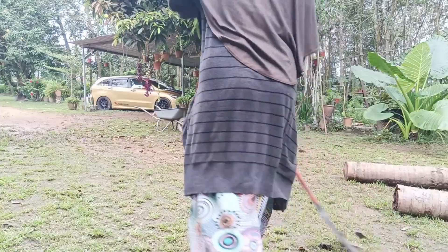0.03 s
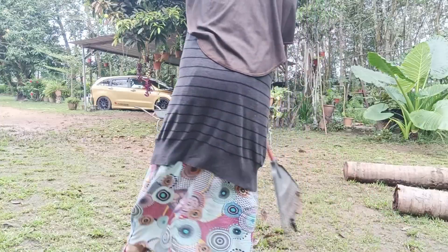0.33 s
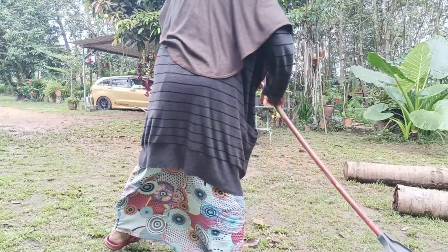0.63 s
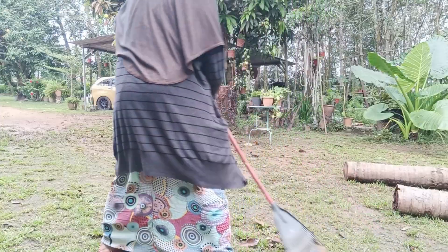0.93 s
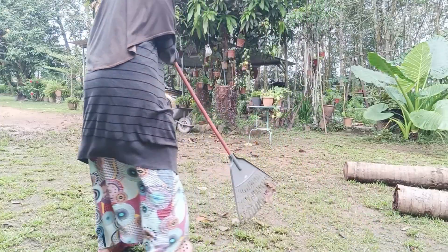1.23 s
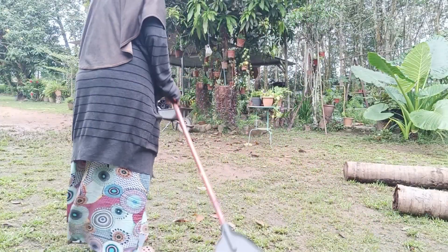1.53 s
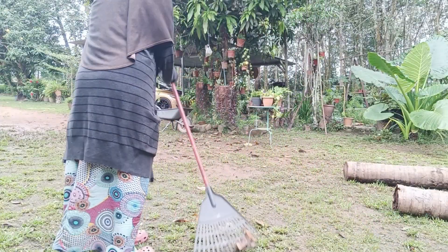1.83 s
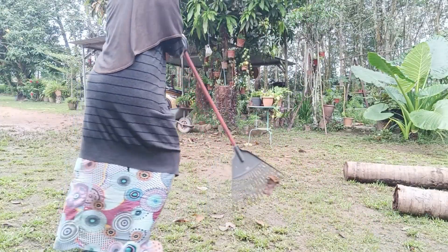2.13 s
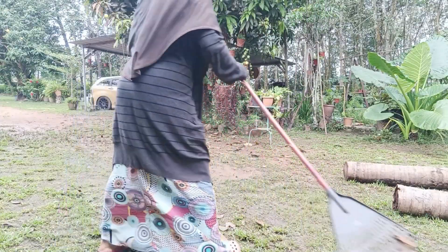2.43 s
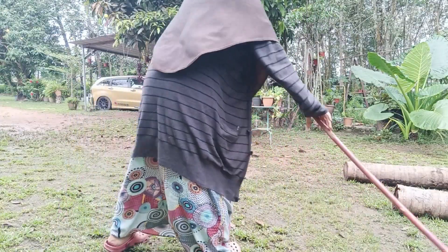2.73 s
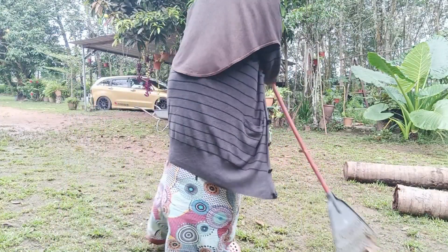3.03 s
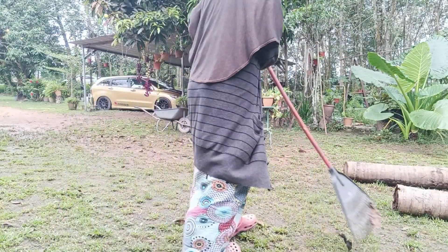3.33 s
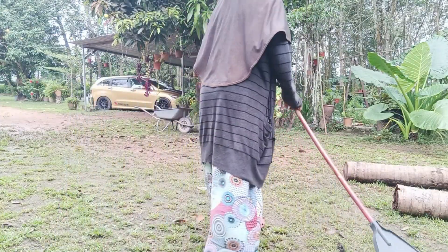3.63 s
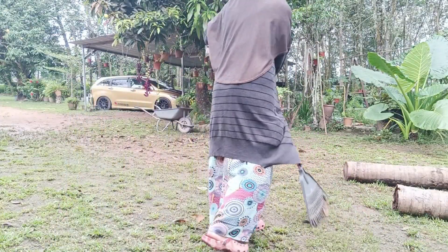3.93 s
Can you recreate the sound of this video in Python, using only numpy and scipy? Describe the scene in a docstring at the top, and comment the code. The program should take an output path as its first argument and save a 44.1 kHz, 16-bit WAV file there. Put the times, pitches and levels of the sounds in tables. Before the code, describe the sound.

A rake scrapes over grass and dry leaves five times, its tines clicking.

```python
"""Raking a yard

A fan rake is pulled five times over grass and dry ground, a metre or two away. Its tines scrape
the soil, ring the fan, crackle through dry leaves and now and then snap free. Behind it are a low
drone and a hiss, whining insects, a few soft notes and a vehicle slowly drawing nearer."""
import sys
import numpy as np
from scipy import signal
from scipy.fft import rfft, irfft
from scipy.io import wavfile
from scipy.ndimage import map_coordinates

SR = 44100
rng = np.random.default_rng(int(sys.argv[2]) if len(sys.argv) > 2 else 0)


def dump_mix(stems):
    """Bounce the given channels to the path in sys.argv[1] as a 16-bit WAV at rate SR."""
    frames = np.atleast_2d(stems).T  # one column per channel
    limited = np.clip(frames, -1, 1)  # hard clip at full scale
    pcm = np.round(limited * 32767).astype(np.int16)
    wavfile.write(sys.argv[1], SR, pcm)


N = 176400  # 4 seconds


def undb(db):
    """Turn decibels into a gain."""
    return 10 ** (np.asarray(db) / 20)


def unit(x):
    """Scale a signal to an average (rms) level of 1."""
    return x / np.sqrt(np.mean(x ** 2) + 1e-20)


def noise():
    """White noise as long as the scene."""
    return rng.standard_normal(N)


def curves(rows):
    """Join a table's rows with straight lines: one curve for each column after the time."""
    times, *columns = np.array(rows, float).T
    return np.array([np.interp(np.arange(N) / SR, times, column) for column in columns])


def wander(per_s):
    """A random curve of size about 1 that turns per_s times a second."""
    return unit(np.interp(np.arange(N) / SR * per_s, np.arange(4096), rng.standard_normal(4096)))


def colour(x, points):
    """Shape a sound's lows and highs through (Hz, dB) points; white noise keeps its power."""
    size = 8192
    hz, db = np.array(points, float).T
    freqs = np.maximum(np.fft.rfftfreq(size, 1 / SR), 1)
    gains = undb(np.interp(np.log(freqs), np.log(hz), db))
    # fold the cepstrum so that the filter never rings before a hit
    cepstrum = irfft(np.log(gains))
    cepstrum[1:size // 2] *= 2
    cepstrum[size // 2 + 1:] = 0
    response = irfft(np.exp(rfft(cepstrum)))
    return signal.fftconvolve(x, response / np.linalg.norm(response))[:N]


def band(hz, width_hz):
    """A band of noise around a pitch that may move."""
    lowpass = signal.butter(4, width_hz / 2, fs=SR, output="sos")
    slow = signal.sosfilt(lowpass, noise() + 1j * noise())
    carrier = np.exp(2j * np.pi * np.cumsum(hz * np.ones(N)) / SR)
    return unit((slow * carrier).real)


def burst(start, rise_s, decay_s):
    """A level that rises in a straight line, then dies away."""
    age = np.arange(N) / SR - start
    return np.clip(age / rise_s, 0, 1) * np.exp(-np.clip((age - rise_s) / decay_s, 0, 50))


def die_away(hits, decay_s):
    """Give every hit a fading tail."""
    return signal.lfilter([1], [1, -np.exp(-1 / (decay_s * SR))], hits)


def flicker(x, depth_db, width_hz=260, per_s=22):
    """Make neighbouring bands of a hiss waver, each on its own."""
    freqs, times, spectrum = signal.stft(x, SR, nperseg=1024)
    chance = rng.standard_normal((256, 256))
    grid = np.meshgrid(freqs / width_hz, times * per_s, indexing="ij")
    db = depth_db * map_coordinates(chance, grid, order=1, mode="mirror")
    return signal.istft(spectrum * undb(db), SR)[1][:N]


# The tone of the drone, middle hiss and high hiss. Each row: frequency in Hz, strength in dB.
DRONE_COLOUR = [(25, -40), (45, -32), (80, -23), (100, -13.5), (125, 2), (165, 2), (195, -2), (280, -36),
                (400, -30), (700, -77)]
MID_HISS_COLOUR = [(300, -32), (660, -41), (780, -17), (880, 2.5), (1250, 3.5), (1750, 1.5), (2000, -12.5),
                   (2400, -21), (2700, -40), (4000, -58)]
HIGH_HISS_COLOUR = [(3000, -43), (4150, -23), (4500, -0.5), (4950, -4), (5450, -12), (5750, -18),
                    (6500, -12), (7400, -23), (8300, -29), (8900, -21.5), (10600, -19.5), (11400, -30),
                    (15500, -41)]
# How loud the drone is. Each row: time in seconds, level in dB.
DRONE_LEVEL = [(0, -47), (.66, -51), (.71, -59.5), (.79, -49.5), (.9, -45), (1.3, -47), (1.7, -42.5),
               (2.3, -40.5), (3.0, -38), (3.3, -44), (4, -45)]
# How loud the hiss is. Each row: time in seconds, middle hiss in dB, high hiss in dB.
HISS_LEVEL = [(0, -46.5, -63), (.45, -52, -61), (.682, -52, -63), (.692, -58.5, -68.5), (.87, -62, -72),
              (1.25, -49, -60.5), (1.455, -46, -59), (1.48, -56, -68.5), (1.7, -53.5, -66),
              (2.1, -63, -60.5), (2.8, -45, -64), (4, -51, -59.5)]


def drone_and_hiss():
    """A road's low drone, and a background hiss that twice drops abruptly, then returns."""
    mid_gain, high_gain = undb(curves(HISS_LEVEL) + 0.5 * wander(24.95))
    # the high hiss is given a patchy, processed-sounding flicker
    high_hiss = flicker(colour(noise(), HIGH_HISS_COLOUR), depth_db=4.0)
    drone = undb(curves(DRONE_LEVEL)[0]) * colour(noise(), DRONE_COLOUR)
    return drone + mid_gain * colour(noise(), MID_HISS_COLOUR) + high_gain * high_hiss


# The insects' whines. Each row: pitch in Hz, width in Hz, relative level in dB.
WHINES = [(4770, 270, -2), (6680, 390, 0.5), (9000, 430, -6), (10600, 600, -12.5)]
# How the whole chorus swells and fades. Each row: time in seconds, gain in dB.
CHORUS_LEVEL = [(0, -67), (.66, -71), (.8, -85), (1.4, -69), (1.5, -84), (1.7, -81), (2.1, -75), (4, -78.5)]


def insects(drift=0.0078, throb_db=3.5):
    """Distant insects: thin whines that drift in pitch and throb, each on its own."""
    chorus = sum(undb(db + throb_db * wander(14)) * band(hz * (1 + drift * wander(4.3)), width)
                 for hz, width, db in WHINES)
    return undb(curves(CHORUS_LEVEL)[0]) * chorus


# The tone of the tyres. Each row: frequency in Hz, strength in dB.
TYRE_COLOUR = [(40, -73), (150, -16.5), (290, 3.5), (350, -14), (430, -47), (620, -27), (790, -1),
               (1000, 1.5), (1400, -1), (2000, -3.5), (2600, -11.5), (3500, -20), (4700, -22), (5800, -30),
               (7700, -38.5), (9200, -35), (12000, -43), (15500, -46)]
# The vehicle drawing nearer. Each row: time in seconds, tyres in dB, roar in dB,
# exhaust pitch in Hz, exhaust in dB, rumble in dB.
APPROACH = [(0, -75, -91, 280, -62, -78), (.65, -71, -90, 280, -75, -61), (.9, -56.5, -59, 280, -47, -85),
            (1.3, -47, -95, 285, -52.5, -74), (1.44, -52.5, -85, 278.2, -60, -64),
            (1.68, -55.5, -81, 275, -50.5, -67), (2.1, -45, -60.5, 270, -48.5, -64),
            (2.45, -42.5, -57.5, 280, -49.5, -78), (2.77, -43.5, -54, 315, -44, -62),
            (2.87, -43.5, -47.5, 265, -50.5, -48), (3.25, -41, -59, 195, -36.5, -54),
            (3.4, -40, -49.5, 225, -41, -42.5), (3.7, -37, -44.5, 240, -36.5, -42.5),
            (3.87, -41.5, -43, 272, -35.5, -41), (4, -42, -38, 300, -49, -43)]


def vehicle():
    """Tyre hiss grows and fills out into a roar, while the exhaust booms over a low rumble."""
    tyres_db, roar_db, exhaust_hz, exhaust_db, rumble_db = curves(APPROACH)
    tyres = undb(tyres_db) * flicker(colour(noise(), TYRE_COLOUR), depth_db=2.0)
    roar = undb(roar_db) * band(hz=490, width_hz=350)
    exhaust = undb(exhaust_db) * band(exhaust_hz, width_hz=90)
    rumble = undb(rumble_db) * band(hz=86.8, width_hz=44)
    return tyres + roar + exhaust + rumble


# Hoot-like notes. Each row: start in seconds, length in seconds, pitch in Hz, level in dB.
HOOTS = [(.345, 0.12, 332, -52.5), (0.353, 0.087, 510, -59), (0.757, 0.049, 588, -49.5),
         (0.886, 0.036, 603, -44), (1.338, 0.058, 274, -40), (1.406, 0.13, 279, -42),
         (1.448, 0.082, 508, -62)]


def hoots(waver=0.0144, hoarseness=0.32):
    """Soft, far-off notes swell and fade: each is a wavering tone with a little noise."""
    t = np.arange(N) / SR
    out = np.zeros(N)
    for start, length, hz, db in HOOTS:
        swell = np.sin(np.pi * np.clip((t - start) / length, 0, 1))
        pitch = hz * (1 + waver * wander(39.4))
        tone = np.sin(2 * np.pi * np.cumsum(pitch) / SR)
        rasp = hoarseness * band(hz, width_hz=130)
        out += undb(db) * swell * (tone + rasp) / np.hypot(1, hoarseness)
    return out


# Bumps on the turf. Each row: start in seconds, pitch in Hz, level in dB.
BUMPS = [(0.947, 687, -40.5), (1.76, 870, -41.5), (1.783, 852, -42), (3.926, 802, -32.5), (3.966, 800, -33)]


def turf_bumps():
    """The rake and feet meet the turf with short, dull bumps."""
    return sum(undb(db) * burst(start, rise_s=0.0052, decay_s=0.015) * band(hz, width_hz=280)
               for start, hz, db in BUMPS)


# Breaking stalks. Each row: start in seconds, level in dB.
STALK_BREAKS = [(0.205, -22), (0.2453, -25), (1.04, -34), (1.163, -19.5), (1.197, -32), (1.9245, -16),
                (1.9835, -11), (2.4355, -32), (3.0775, -20.5), (3.1485, -25), (3.887, -20)]
# The tone of a break. Each row: frequency in Hz, strength in dB.
BREAK_COLOUR = [(1000, -10), (3000, -4), (5000, 0.5), (8000, -4.5), (11500, -5), (14000, 1.5)]


def stalk_breaks():
    """Each dry stalk breaks with one very short, bright click."""
    level = sum(undb(db) * burst(start, rise_s=0.0001, decay_s=0.00027) for start, db in STALK_BREAKS)
    return colour(noise() * level, BREAK_COLOUR)


# Faint leaf ticks, quiet at first, growing louder from the third stroke to the end.
# Each row: time in seconds, relative level in dB.
TICK_LEVEL = [(0, -78), (1.7, -80), (2.1, -71), (4, -67)]


def settling_leaves(per_s=69, spread_db=0.5):
    """The level curve of the lone, faint ticks that leaves make as they settle."""
    hits = rng.random(N) < per_s / SR
    db = curves(TICK_LEVEL)[0] + spread_db * np.minimum(rng.exponential(size=N), 4)
    return die_away(hits * undb(db), decay_s=0.002)


# The tones of the rake's fan. Each row: pitch in Hz, relative level in dB, seconds to fade by 60 dB.
FAN_TONES = [(342, -15.5, 0.067), (507, -2.5, 0.041), (696, -1, 0.12), (779, 4, 0.07), (1020, 1, 0.089),
             (1356, 0.5, 0.075), (1427, -3.5, 0.091), (1615, 0.5, 0.047), (1850, 4, 0.075),
             (1923, -0.5, 0.15), (2100, -14, 0.074), (2376, -3.5, 0.085), (2590, -9.5, 0.3),
             (2840, -13, 0.21), (3740, -11.5, 0.13), (3880, -9, 0.17), (4390, -8, 0.22), (5260, -30, 0.12)]


def fan_ring(push, lowest_hz=265):
    """The fan of tines rings on after every push, but gives off little bass."""
    t = np.arange(SR // 2) / SR
    ring = sum(undb(db - 60 * t / fade_s) * np.sin(2 * np.pi * hz * t) / np.sqrt(fade_s)
               for hz, db, fade_s in FAN_TONES)
    ring = signal.sosfilt(signal.butter(4, lowest_hz, "high", fs=SR, output="sos"), ring)
    return signal.fftconvolve(push, ring / np.linalg.norm(ring))[:N]


# Slaps between tines. Each row: start in seconds, level in dB.
SLAPS = [(0.023, -35), (0.124, -34), (0.181, -27), (1.887, -19), (1.891, -19), (1.953, -14.5), (1.961, -30),
         (1.996, -17), (2.0052, -17), (2.0147, -24)]
# The tone of a slap. Each row: frequency in Hz, strength in dB.
SLAP_COLOUR = [(500, -37), (900, -12), (1300, 3.5), (2200, 2), (2700, -10.5), (3400, -35), (8000, -32)]


def tine_slaps(ring_db=-11.5):
    """Tines slap each other: a short, hollow crack that also rings the fan."""
    slaps = noise() * sum(undb(db) * burst(start, rise_s=0.00041, decay_s=0.0016) for start, db in SLAPS)
    return colour(slaps, SLAP_COLOUR) + undb(ring_db) * fan_ring(slaps)


# Tines snapping free. Each row: start in seconds, then relative levels in dB of knock, crack and tick.
SNAPS = [(0.051, -44, -36, -41), (0.1222, -25.5, -27.5, -31), (0.1555, -48, -27, -46),
         (0.191, -29, -30, -39), (0.2045, -44, -42, -33), (0.2412, -32, -35, -31), (0.245, -31, -22, -38),
         (0.255, -38, -25, -40), (0.2815, -43, -33, -34), (0.325, -60, -35.5, -60), (0.345, -57, -33, -62),
         (1.079, -26, -31, -44), (1.122, -30, -34, -41), (1.137, -24, -39, -43), (1.736, -43, -37.5, -41),
         (1.812, -54, -50, -33), (1.8877, -23, -30, -40), (1.9147, -15, -35, -30), (1.918, -19, -40, -45),
         (1.9235, -19, -33, -37), (1.9521, -15, -31, -36), (1.977, -26, -17, -29), (1.9827, -36, -28, -35),
         (1.991, -18, -21, -30), (1.995, -18, -34, -38), (2.0065, -21, -25, -32), (2.916, -54, -49, -46),
         (2.999, -39, -40, -30), (3.055, -40, -31, -39), (3.0695, -45, -47, -34), (3.077, -24, -28, -39),
         (3.136, -40, -42, -34), (3.147, -25, -28.5, -37), (3.849, -45, -48, -31), (3.888, -23, -34, -31),
         (3.904, -18, -29, -45)]
# How fast a snap dies, in seconds: one value each for knock, crack and tick.
SNAP_DECAY_S = [0.0023, 0.0016, 0.00093]


def tine_snaps():
    """Level curves for the knock, crack and tick of tines snapping free; the tick dies first."""
    hits = np.zeros((3, N))
    for start, *levels_db in SNAPS:
        hits[:, int(start * SR)] += undb(levels_db)
    return [die_away(part, decay_s) for part, decay_s in zip(hits, SNAP_DECAY_S)]


# Brushes of grass. Each row: start in seconds, fade time in seconds, relative level in dB.
BRUSHES = [(0.626, .03, -59), (0.736, 0.028, -56.5), (0.756, 0.017, -57), (2.428, 0.025, -49),
           (2.477, 0.044, -55), (3.675, .05, -51)]


def grass_brushes(rise_s=0.011):
    """The level curve of light brushes against the grass between strokes."""
    return sum(undb(db) * burst(start, rise_s, decay_s) for start, decay_s, db in BRUSHES)


def fractures(per_s=1700, decay_s=0.0004, spread_db=1.5, catch_db=2.5, catches_per_s=90):
    """The level curve of countless tiny fractures, mostly weak, surging where the tines catch."""
    hits = rng.random(N) < per_s / SR
    sizes = undb(spread_db * np.minimum(rng.exponential(size=N), 5))
    power = die_away((hits * sizes) ** 2, decay_s / 2)
    catching = undb(catch_db * wander(catches_per_s))
    return unit(np.sqrt(power + 1e-12) * catching)


def scrape(drag, clicks, shared_grit, smooth):
    """Tines drag over one surface: gritty noise plus clicks. More 'smooth' evens out the grit."""
    hiss = noise()
    texture = unit(smooth + shared_grit + 0.6 * fractures())
    return hiss * np.hypot(drag * texture, clicks)


def pull(rows, edge_s=0.021):
    """Level curves for soil, leaves and grass through one stroke, fading at both ends."""
    t = np.arange(N) / SR
    start, end = rows[0][0], rows[-1][0]
    outside_s = np.maximum(np.maximum(start - t, t - end), 0)
    return undb(curves(rows)) * np.exp(-outside_s / edge_s)


# The five strokes, one table each. Each row: time in seconds, then relative levels in dB
# of soil scrape, leaf crackle and grass rustle.
STROKES = [
    [(0.0, -46, -48.5, -53), (0.06, -34, -46, -42.5), (0.112, -36, -43, -45.5), (0.14, -35.5, -39.5, -43),
     (0.185, -41, -36, -40), (0.21, -35.5, -37, -41), (0.226, -39.5, -48, -43), (0.247, -41, -33, -39),
     (0.3, -54, -48.5, -49.5), (0.35, -70, -52, -68), (0.4, -65, -57, -59)],
    [(0.89, -60, -62, -58.5), (0.904, -53, -54, -59), (0.922, -53, -54, -50), (0.95, -41, -49, -46.5),
     (0.966, -45, -51, -51), (0.99, -40, -45, -48), (1.082, -31.5, -43.5, -42.5), (1.1, -36, -46, -45.5),
     (1.128, -26.5, -38, -40), (1.148, -38, -45.5, -45.5), (1.222, -37, -40, -40.5),
     (1.27, -58, -61, -54.5)],
    [(1.72, -52.5, -74, -65), (1.794, -32.5, -49, -47), (1.82, -39.5, -54, -48.5), (1.875, -30.5, -44, -40),
     (1.89, -22, -37, -35), (1.9, -26.5, -39, -37.5), (1.92, -24.5, -39, -38), (1.944, -28.5, -45, -39),
     (1.964, -28, -36, -36), (1.978, -25, -25, -38), (1.996, -21.5, -23, -33), (2.012, -25, -31, -42),
     (2.03, -35, -41, -41.5), (2.1, -54, -50.5, -57.5)],
    [(2.88, -64, -60, -57), (2.924, -38, -50.5, -48.5), (2.988, -33.5, -44, -42), (3.003, -39, -40, -36.5),
     (3.025, -35, -52, -46), (3.056, -27.5, -38, -43), (3.066, -39, -49, -45), (3.083, -29.5, -38, -38),
     (3.122, -36, -50, -44.5), (3.152, -28.5, -50, -42), (3.158, -33, -44, -43.5), (3.26, -48, -54, -62)],
    [(3.78, -34, -58, -56), (3.788, -45, -55, -49), (3.842, -32, -49, -53), (3.848, -36, -55, -44),
     (3.88, -28, -45, -46), (3.888, -36, -35.5, -43), (3.9, -35, -38, -43), (3.912, -49, -37, -39),
     (3.924, -28, -43, -43), (3.956, -29, -45, -42), (4.0, -29.5, -50, -47)],
]
# How strongly the fan rings, most when the tines are pressed hard: one gain in dB for each stroke.
STROKE_RING_DB = [-12, -20, -11, -23, -27]
# The tone of each surface. Each row: frequency in Hz, strength in dB.
SOIL_COLOUR = [(30, -51), (120, -11), (240, -18.5), (330, 6), (390, -3.5), (470, 1.5), (680, 1), (900, -1),
               (1300, -1.5), (1900, -9.5), (2500, -13), (3500, -19.5), (7000, -54.5)]
LEAF_COLOUR = [(1200, -17.5), (2200, 4.5), (2800, 0.5), (3300, 2), (4200, 5), (5200, 1), (6600, -6.5),
               (8000, -6.5), (12000, -17)]
GRASS_COLOUR = [(4000, -7.5), (6200, 2), (7300, -2), (9500, 0), (11700, -6), (13300, 0), (15500, -4)]


def rake(leaf_tick_db=-1, snap_ring_db=-9.5):
    """Tines drag and snap through soil, leaves and grass; the hard contacts ring the fan."""
    grit = fractures()
    pulls = [pull(rows) for rows in STROKES]
    soil_drag, leaf_drag, grass_drag = sum(pulls)
    knock, crack, tick = tine_snaps()
    dull_clicks = crack + undb(leaf_tick_db) * settling_leaves()
    fine_clicks = tick + settling_leaves()
    soil = scrape(soil_drag, knock, grit, smooth=0.39)
    leaves = scrape(leaf_drag, dull_clicks, grit, smooth=1.0)
    grass = scrape(grass_drag + grass_brushes(), fine_clicks, grit, smooth=0.27)
    ground = (undb(-4.5) * colour(soil, SOIL_COLOUR)
              + undb(-3.1) * colour(leaves, LEAF_COLOUR)
              + undb(-1.6) * colour(grass, GRASS_COLOUR))
    pressure = sum(undb(db) * np.hypot(on_soil, on_leaves)
                   for db, (on_soil, on_leaves, _) in zip(STROKE_RING_DB, pulls))
    push = pressure * grit + undb(snap_ring_db) * knock
    return ground + fan_ring(noise() * push)


def yard(x, fade_s=0.11, echo_db=-16.5, delay_s=0.006):
    """Add the faint echo that scatters back from trees and ground."""
    t = np.arange(SR // 2) / SR
    tail = rng.standard_normal(len(t)) * undb(-60 * t / fade_s) * (t > delay_s)
    return x + undb(echo_db) * signal.fftconvolve(x, tail / np.linalg.norm(tail))[:N]


def scene():
    """The rake and hoots echo in the yard, with drone, hiss, vehicle and insects behind."""
    raking = rake() + tine_slaps() + stalk_breaks() + turf_bumps()
    return (yard(raking + hoots()) + drone_and_hiss() + vehicle() + insects())[None]


def record(dry, top_hz=15650):
    """Cut away the very highest treble."""
    return signal.sosfilt(signal.ellip(10, .2, 80, top_hz, fs=SR, output="sos"), dry)


dry = scene()
out = record(dry)
dump_mix(out)
```